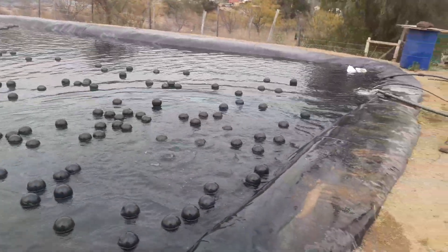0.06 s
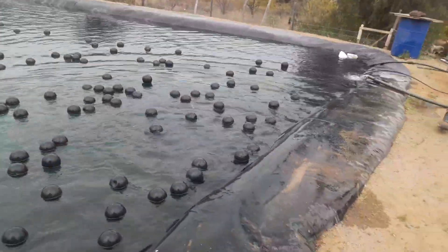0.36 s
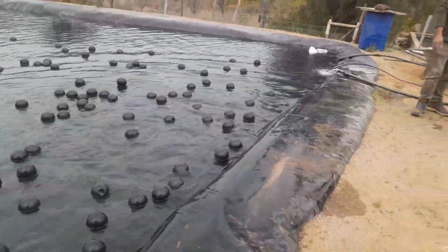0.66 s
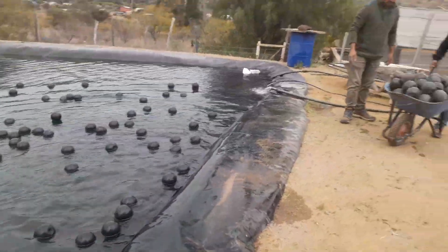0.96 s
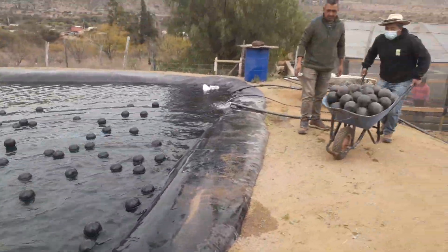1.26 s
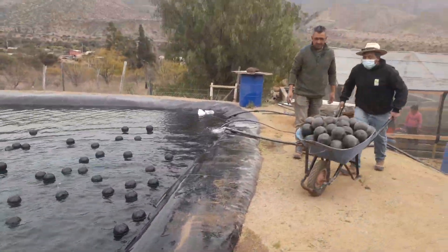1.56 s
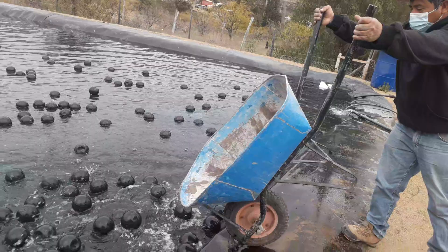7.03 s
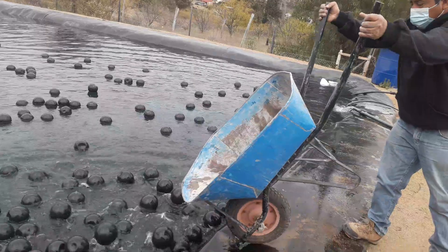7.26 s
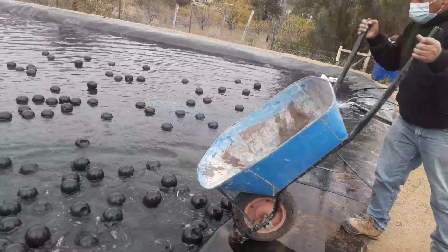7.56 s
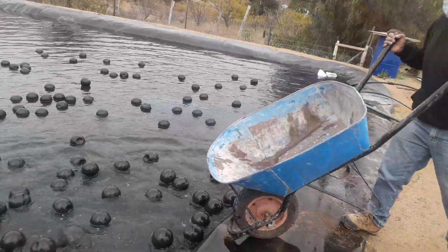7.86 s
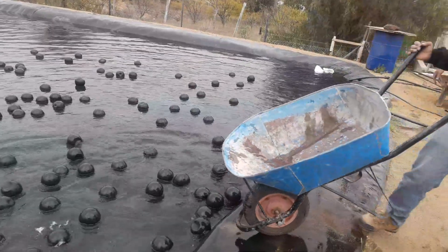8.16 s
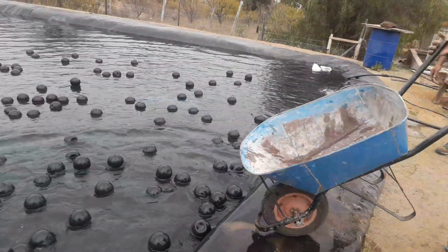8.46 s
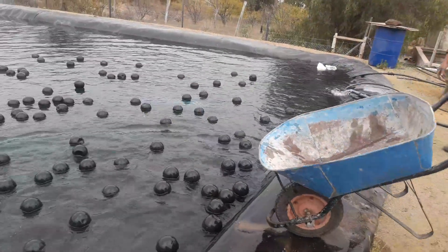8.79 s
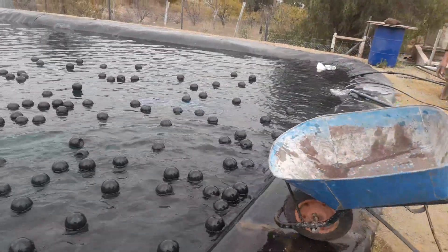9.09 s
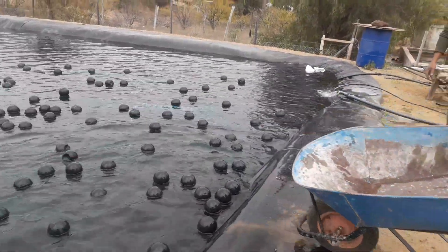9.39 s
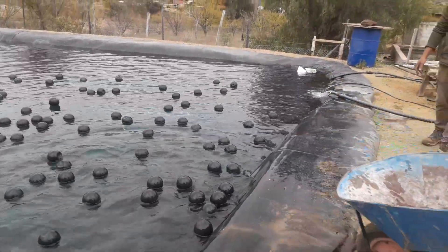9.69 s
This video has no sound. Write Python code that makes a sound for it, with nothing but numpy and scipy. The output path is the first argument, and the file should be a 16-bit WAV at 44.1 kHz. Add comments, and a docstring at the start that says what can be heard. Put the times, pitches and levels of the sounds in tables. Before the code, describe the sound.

Outdoors beside a lined pond, water laps and fizzes while wind buffets the microphone. A loaded steel wheelbarrow rolls over crunching grit and a distant bird whistles once. The barrow tips, and many hollow plastic balls drum on its tray, clack against each other and the liner, and splash into the water. The flow thins to a few clumps, the pond sloshes, and the empty tray rattles and scrapes as it is set back.

```python
"""Outdoors by a lined pond: water laps and fizzes, wind buffets the microphone.
A steel wheelbarrow of hollow plastic balls rolls up over crunching grit; a bird whistles once.
The barrow tips: balls drum on the tray, clack on each other and the liner, and splash into the water.
The flow thins to a few clumps, the pond sloshes, and the empty tray rattles as it is set back."""
import sys
import numpy as np
from scipy import signal
from scipy.fft import rfft, irfft
from scipy.io import wavfile
from scipy.ndimage import uniform_filter1d

SR = 44100
rng = np.random.default_rng(int(sys.argv[2]) if len(sys.argv) > 2 else 0)


def generate_wav(signal):
    """Clip the signal to [-1, 1] and save it as 16-bit WAV at the path in sys.argv[1]."""
    frames = np.transpose(np.atleast_2d(signal))
    scaled = np.clip(frames, -1, 1) * 32767
    pcm = np.round(scaled).astype(np.int16)
    wavfile.write(sys.argv[1], SR, pcm)


N = 437898
TIME = np.arange(N) / SR

# spectra: f/Hz, gain/dB
WIND_EQ = [(20, -25), (45, -14), (80, 3), (130, 5.5), (200, -3), (300, -16), (500, -33.5), (1000, -57)]
LAP_EQ = [(100, -4.5), (250, -3), (400, -18), (700, -2.5), (1000, -8.5), (1400, 0), (2100, -2.5),
          (2850, -8.5), (5000, -4.5), (12000, -33)]
GRIT_EQ = [(1470, -9), (2800, -9), (4000, 0.5), (5200, 3), (6300, -6.5), (7530, 0), (9150, -14.5),
           (10300, -18), (12300, -10), (15500, -15)]
SCRAPE_EQ = [(100, -15.5), (300, -4), (700, 4), (2000, 6.5), (2900, -1), (4200, -1), (7500, -6),
             (10000, -20.5), (12500, -16), (15500, -32)]
TYRE_EQ = [(100, 4.5), (300, -9), (700, 1.5), (1100, -10), (2000, -2), (3000, -18), (8000, -23)]
THUD_EQ = [(40, -43), (80, -14), (130, -7.5), (200, 1.5), (330, -3), (520, -8), (750, -14.5), (1200, -17),
           (2500, -50)]
SHELL_EQ = [(200, -39.5), (450, -12.5), (700, 1.5), (1100, -3.5), (1800, -4), (2400, -8), (2850, -12),
            (3800, -0.5), (6000, -63)]
CRACK_EQ = [(60, -48), (500, -17), (1500, -2.5), (2300, -8), (2850, -18.5), (3450, -4.5), (4300, 3),
            (5900, -6.5), (7400, -4.5), (8600, -12), (10000, -24), (11800, -14), (13500, -24.5),
            (15500, -22.5)]
# gusts on the microphone: t/s, length/s, level/dB
WIND_GUSTS = [(-.03, 0.087, -47.5), (1.187, 0.74, -35), (1.988, 0.63, -31), (2.887, 0.13, -37),
              (3.571, 0.044, -30.5), (5.82, 0.25, -38), (7.062, 0.62, -46), (7.588, 0.064, -37),
              (9.478, 0.19, -44)]
# single buffets: t/s, peak/dB, length/s
WIND_BUFFETS = [(2.045, -15, 0.025), (2.076, -10.5, 0.083), (2.24, -18.5, 0.039), (2.32, -17, 0.045),
                (2.42, -23.5, 0.057)]
# wavelets slapping the bank: t/s, level/dB
BANK_WAVELETS = [(.05, -61), (1.6, -53), (1.8, -62), (7.22, -44.5)]
# sloshes at the bank and around bobbing balls: t/s, length/s, bubble f/Hz, level/dB
POND_SLOSHES = [(0.439, 0.06, 4900, -32.5), (7.713, 0.085, 1190, -39), (7.847, 0.048, 1390, -36),
                (8.096, 0.067, 1760, -43), (8.689, .1, 2400, -34), (8.771, 0.091, 1350, -35.5),
                (9.269, 0.066, 1580, -34)]
# grit under wheel and boots: t/s, length/s, level/dB
GRIT_CRUNCHES = [(2.433, 0.72, -50.5), (8.01, 0.09, -51), (8.266, 0.274, -51.5)]
# drags over ground and liner: t/s, length/s, level/dB, tilt/(dB/octave)
DRAGS = [(0.552, 0.11, -39.5, -2), (1.992, 0.047, -37, -1), (2.424, 0.11, -39, 1.5), (2.597, 0.38, -40, 6),
         (2.896, 0.3, -50, 4), (6.646, 0.085, -34, 6.5), (7.38, 0.02, -24, 5), (7.99, 0.039, -38.5, -2),
         (8.107, 0.058, -36, 0), (9.165, 0.2, -38, 2), (9.563, 0.048, -35.5, 3.5), (9.61, 0.1, -27, 0)]
# stones underfoot, shells meeting: t/s, level/dB
DRY_TICKS = [(1.862, -25), (1.914, -23), (2.26, -21.5), (2.46, -16), (2.625, -23), (2.638, -21),
             (2.66, -24), (2.733, -23), (2.757, -14.5), (2.783, -7.5), (2.931, -21), (3.035, -21),
             (3.063, -15.5), (3.193, -22), (3.356, -17.5), (3.471, -20), (8.085, -17), (8.304, -19.5),
             (8.493, -16.5), (8.544, -17.5), (8.576, -19.5), (8.93, -20), (9.162, -10.5)]
# modes of the loaded tray: f/Hz, level/dB, t60/s
TRAY_MODES = [(199.3, 2.5, 0.16), (240.7, -6.5, 0.38), (272.5, -1.5, 0.24), (312.2, -1.5, 0.14),
              (409.7, -4.5, 0.18), (532.6, -8.5, 0.2), (609, -0.5, 0.091), (659, -7, 0.26),
              (770, -9.5, 0.33), (974, -14, 0.23)]
# jolts of the empty tray: t/s, level/dB
TRAY_JOLTS = [(6.45, -44), (6.8, -57), (7.17, -40), (7.37, -34.5), (9.6, -28)]
# blows on the tray: t/s, peak/dB
TRAY_KNOCKS = [(3.699, -16), (3.823, -14), (4.06, -29), (4.168, -3), (4.392, -4), (4.738, -4.5),
               (4.775, -3), (5.037, -6), (5.167, -8), (7.195, -27), (8.506, -22), (9.147, -18.5),
               (9.493, -22), (9.584, -17.5)]
# single plops: t/s, f/Hz, peak/dB
BALL_PLOPS = [(1.02, 2470, -26), (3.323, 1076, -26), (3.958, 1320, -16), (5.545, 810, -13),
              (5.867, 1030, -15), (6.056, 790, -19), (6.41, 783, -14.5), (6.542, 735, -16),
              (6.724, 655, -20.5), (6.731, 850, -21), (6.804, 280, -25.5), (7.39, 1160, -18),
              (7.725, 990, -33), (8.145, 1600, -31)]
# shells ringing after sharp hits: t/s, f/Hz, peak/dB
SHELL_PINGS = [(6.298, 4000, -14), (6.504, 4160, -11), (7.388, 4900, -16)]
# loud ball hits: t/s, crack level/dB, shell and splash level/dB
BALL_CLACKS = [(4.164, -15, -13), (4.345, -8, -23), (4.532, -3.5, -10.5), (4.612, -0.5, -11.5),
               (4.68, -5, -16), (4.735, 1, -18), (4.777, -8, -16), (4.811, -3.5, -10), (5.015, -16, -24),
               (5.344, -7.5, -30), (5.387, -3.5, -11.5), (5.407, -3.5, -16), (5.475, -7, -18),
               (5.662, -6.5, -11.5), (5.668, -7, -18), (5.826, -11, -16), (5.861, -5, -13.5),
               (5.998, -21, -27), (6.053, -16, -14.5), (6.299, -8, -18.5), (6.372, -5, -23),
               (6.41, -11.5, -17), (6.48, -13, -19), (6.504, -5.5, -37), (6.542, -9.5, -30),
               (6.654, -16, -31), (6.667, -13, -44), (6.722, -13, -21), (6.8, -15.5, -23.5),
               (7.05, -15, -46), (7.312, -23, -22.5), (7.387, -10, -21), (7.473, -18, -26)]
# clumps and gaps among the last balls: t/s, clatter and spray gain/dB
BALL_CLUMPS = [(5.38, 0), (5.85, 0.5), (6.26, -4.5), (6.39, 5), (6.49, -7), (6.74, 1.5), (7.04, 3.5),
               (7.28, 2)]

ROLL_S, CREEP_S, SPILL_S, SLIDE_S, EMPTY_S, LANDED_S = 2.31, 3.53, 3.675, 3.995, 6.46, 7.42
FULL_FLOW_S, ONSET_S, RUN_OUT_S = 0.27, 0.084, 0.11
EMPTY_PITCH_RATIO = 1.063  # tray modes rise with the load off


def amp(db):
    """Decibels to gain."""
    return 10 ** (np.asarray(db) / 20)


def unit(x):
    """Scale to rms 1."""
    return x / np.sqrt(np.mean(x ** 2) + 1e-20)


def peak(x):
    """Scale to peak 1."""
    return x / np.max(np.abs(x))


def unit_hit(x):
    """Scale to the energy of a typical hit of peak 1."""
    return x / np.sqrt(np.sum(x ** 2) / SR) * 0.025


def span(length_s):
    """Time axis of a short sound."""
    return np.arange(int(length_s * SR)) / SR


def noise(t):
    """White noise as long as t."""
    return rng.standard_normal(len(t))


def decay(t, t60_s):
    """Exponential fall, 60 dB in t60_s."""
    return np.exp(-np.log(1000) * t / t60_s)


def arch(t, length_s):
    """Half-sine envelope."""
    return np.sin(np.pi * np.minimum(t / length_s, 1))


def gate(start_s, end_s, attack_s=ONSET_S, release_s=RUN_OUT_S):
    """Linear rise from start_s, linear fall from end_s."""
    return np.clip((TIME - start_s) / attack_s, 0, 1) * np.clip(1 - (TIME - end_s) / release_s, 0, 1)


def swell(s, width_s):
    """Gaussian bump at time s."""
    return np.exp(-((TIME - s) / width_s) ** 2)


def sway(depth_db, rate_hz):
    """Randomly wandering gain."""
    size = int(SR / rate_hz)
    return amp(depth_db * unit(uniform_filter1d(uniform_filter1d(noise(TIME), size), size // 2)))


def add(out, s, sound):
    """Mix a sound in at time s."""
    i = int(s * SR)
    out[i:i + len(sound)] += sound[:max(N - i, 0)]


def colour(x, eq, size=4096):
    """Minimum-phase filter through (f/Hz, gain/dB) points."""
    hz, db = np.transpose(eq)
    bins_hz = np.arange(size // 2 + 1) * SR / size
    log_gain = np.log(amp(np.interp(np.log(bins_hz + 1), np.log(hz), db)))
    cepstrum = irfft(log_gain)
    cepstrum[1:size // 2] *= 2
    cepstrum[size // 2 + 1:] = 0
    return signal.fftconvolve(x, irfft(np.exp(rfft(cepstrum))))[:len(x)]


def shower(shapes, rate_hz, spread_db):
    """Random impacts of uneven size drawn from shapes, levelled to rms near 1."""
    out, shapes = np.zeros(N), [unit(shape) for shape in shapes]
    chance, pick = rng.random(N), rng.integers(len(shapes), size=N)
    size = np.minimum(rng.standard_exponential(N), 3.2)
    for i in np.flatnonzero(chance < rate_hz / SR):
        add(out, i / SR, amp(spread_db * size[i]) * shapes[pick[i]])
    power = uniform_filter1d(uniform_filter1d(out ** 2, SR // 9), SR // 14)
    return out / np.sqrt(np.abs(power) + 1e-3 * np.mean(out ** 2))


def wind(breeze_db=-61.5):
    """Eddies rumble on the microphone; hard buffets reach higher in pitch."""
    eddies = sway(depth_db=4.5, rate_hz=36)
    gusts = sum(amp(db) * gate(s, s + length_s, attack_s=0.32 * length_s, release_s=0.11)
                for s, length_s, db in WIND_GUSTS)
    out = (amp(breeze_db) + gusts) * unit(colour(noise(TIME), WIND_EQ) * eddies)
    buffet_eq = [(1.47 * hz, db) for hz, db in WIND_EQ]
    t = span(0.15)
    for s, db, length_s in WIND_BUFFETS:
        add(out, s, amp(db) * peak(colour(noise(t) * arch(t, length_s), buffet_eq)))
    return out


def bird(start_s=3.21, length_s=0.15, first_hz=4830, last_hz=3680, peak_db=-40):
    """One thin, distant, falling whistle."""
    along = np.clip((TIME - start_s) / length_s, 0, 1)
    hz = first_hz + (last_hz - first_hz) * along
    return amp(peak_db) * np.sin(np.pi * along) ** 2 * np.sin(2 * np.pi * np.cumsum(hz) / SR)


def bubble(hz, cycles):
    """An air pocket rings and glides up as it surfaces."""
    t = span(0.08)
    t60_s = cycles / hz
    glide = 1 + 0.17 * np.minimum(t / t60_s, 1)
    return np.sin(2 * np.pi * hz * t * glide) * decay(t, t60_s)


def bubbles(rate_hz, low_hz, high_hz, cycles, count=2000):
    """Bubbles of random time, pitch and size; rms 1."""
    out = np.zeros(N)
    gaps, pitches, sizes = rng.random((count, 3)).T
    for s, pitch, size in zip(np.cumsum(-np.log(gaps) / rate_hz), pitches, sizes):
        add(out, s, amp(17.4 * size) * bubble(low_hz * (high_hz / low_hz) ** pitch, cycles))
    return unit(out)


def lapping(calm_db=-52, stirred_db=-49.5):
    """The pond laps and gurgles in clusters, a little louder once the balls are in."""
    base = amp(np.interp(TIME, [SPILL_S, SLIDE_S], [calm_db, stirred_db]))
    wavelets = sum(amp(db) * swell(s, width_s=0.1) for s, db in BANK_WAVELETS)
    lull = amp(-7 * swell(0.47, width_s=0.079))
    t = span(0.02)
    laps = shower([noise(t) * decay(t, 0.043) for _ in range(20)], rate_hz=700, spread_db=3.9)
    gurgles = bubbles(rate_hz=36, low_hz=1100, high_hz=2500, cycles=30)
    water = amp(3.5) * unit(colour(laps, LAP_EQ)) + amp(-4.5) * gurgles
    return (base + wavelets) * lull * sway(depth_db=2, rate_hz=12) * water


def crackle(floor_db=-49.5):
    """Tiny bubbles and grit fizz throughout, swelling as wheel and boots crunch."""
    crunches = sum(amp(db) * gate(s, s + length_s, attack_s=0.012, release_s=0.035)
                   for s, length_s, db in GRIT_CRUNCHES)
    t = span(0.02)
    bursts = [bubble(hz, cycles=6) for hz in np.geomspace(3000, 13000, 14)]
    grains = [noise(t) * decay(t, 0.002) for _ in range(9)]
    specks = unit(colour(shower(bursts + grains, rate_hz=900, spread_db=6.1), GRIT_EQ))
    hiss = unit(colour(noise(TIME), GRIT_EQ))
    flicker = sway(depth_db=2.3, rate_hz=26)
    froth = bubbles(rate_hz=120, low_hz=3990, high_hz=8150, cycles=114)
    fizz = flicker * (amp(1.5) * specks + amp(-3.5) * froth)
    return (amp(floor_db) + crunches) * (fizz + amp(-7) * hiss)


def sloshes(count=12, range_octaves=1.15):
    """Short washes of water, each trapping bubbles of like size."""
    out = np.zeros(N)
    t = span(0.3)
    for s, length_s, hz, db in POND_SLOSHES:
        add(out, s, amp(db - 18.5) * unit(colour(noise(t), LAP_EQ)) * arch(t, length_s))
        for when, pitch, softness in rng.random((count, 3)):
            bubble_hz = hz * 2 ** (range_octaves * (pitch - 0.5))
            add(out, s + when * length_s, amp(db - 9.6 * softness) * bubble(bubble_hz, cycles=43))
    return out


def scrapes():
    """Dragging: dense runs of tiny slips, brighter on sharp grit."""
    out = np.zeros(N)
    t = span(0.4)
    for s, length_s, db, tilt_db in DRAGS:
        slips = noise(t) * amp(4.6 * unit(uniform_filter1d(noise(t), SR // 400)))
        eq = [(hz, gain_db + tilt_db * np.log2(hz / 2000)) for hz, gain_db in SCRAPE_EQ]
        add(out, s, amp(db) * unit(colour(slips, eq)) * np.sqrt(np.abs(arch(t, length_s))))
    return out


def ticks():
    """Dry clicks of stones underfoot and shells meeting."""
    out = np.zeros(N)
    t = span(0.05)
    for s, db in DRY_TICKS:
        click = noise(t) * (decay(t, 0.012) + amp(-16) * decay(t, 0.056))
        add(out, s, amp(db - 3.5) * unit_hit(colour(click, GRIT_EQ)))
    return out


def wheel(level_db=-48):
    """The tyre crushes packed earth in dull grains until the barrow stops to tip."""
    t = span(0.01)
    grains = shower([noise(t) * decay(t, 0.012) for _ in range(20)], rate_hz=600, spread_db=4.3)
    return amp(level_db) * gate(ROLL_S, SPILL_S) * unit(colour(grains, TYRE_EQ))


def tray_blow(thud_db, thud_t60_s, damping, pitch_ratio=1):
    """A dull thud plus steel modes that vary with load and place struck."""
    t = span(0.5)
    ring = np.zeros(len(t))
    for hz, db, t60_s in TRAY_MODES:
        gain = amp(db) * rng.normal(1, 0.45)
        mode_hz = pitch_ratio * hz * rng.normal(1, 0.0097)
        phase = np.pi * rng.integers(2)
        ring += gain * np.sin(2 * np.pi * mode_hz * t + phase) * decay(t, t60_s / damping)
    thud = peak(colour(noise(t) * decay(t, thud_t60_s), THUD_EQ))
    low_cut = signal.butter(2, 115, "high", fs=SR, output="sos")  # the blows are cut below about 115 Hz
    return signal.sosfilt(low_cut, peak(ring) + amp(thud_db) * thud)


def tray_rattle(t60_s=0.79, shiver_db=-49.5):
    """The empty tray shivers when handled and shakes after each jolt."""
    shakes = sum(amp(db) * (TIME > s) * decay(np.abs(TIME - s), t60_s) for s, db in TRAY_JOLTS)
    shiver = amp(shiver_db) * gate(EMPTY_S, TIME[-1])
    blows = [tray_blow(thud_db=0, thud_t60_s=0.2, damping=0.62, pitch_ratio=EMPTY_PITCH_RATIO)
             for _ in range(12)]
    return (shakes + shiver) * shower(blows, rate_hz=60, spread_db=3.1)


def tray_hum(start_s=5.24, level_db=-36, t60_s=0.64):
    """The last rolling balls excite the lightened tray's lowest mode."""
    t = span(0.5)
    mode = np.sin(2 * np.pi * TRAY_MODES[0][0] * t) * decay(t, t60_s)
    hum = shower([mode], rate_hz=90, spread_db=2.2)
    return amp(level_db) * gate(start_s, EMPTY_S, attack_s=FULL_FLOW_S) * hum


def tray_knocks():
    """Single blows on the tray, ringing higher once it is empty."""
    out = np.zeros(N)
    for s, db in TRAY_KNOCKS:
        ratio = EMPTY_PITCH_RATIO if s > EMPTY_S else 1
        blow = tray_blow(thud_db=5.7, thud_t60_s=0.13, damping=1, pitch_ratio=ratio)
        add(out, s, amp(db) * peak(blow))
    return out


def plops():
    """The hollow behind a ball closes, or a ball bobs."""
    out = np.zeros(N)
    for s, hz, db in BALL_PLOPS:
        add(out, s, amp(db) * bubble(hz, cycles=34.6))
    return out


def pings(t60_s=0.029):
    """A sharp hit leaves a shell ringing on one high mode."""
    out = np.zeros(N)
    t = span(0.05)
    for s, hz, db in SHELL_PINGS:
        add(out, s, amp(db) * np.sin(2 * np.pi * hz * t) * decay(t, t60_s))
    return out


def shell(t60_s, count=14):
    """Hollow tock of a thin plastic ball: a cluster of quickly damped modes."""
    t = span(0.15)
    hz = 450 * 2 ** (3 * rng.random((count, 1)))
    gains = rng.standard_normal((count, 1))
    modes = gains * np.sin(2 * np.pi * hz * t) * decay(t, t60_s * np.sqrt(1000 / hz))
    scuff = 0.45 * noise(t) * decay(t, t60_s)
    return peak(colour(peak(modes.sum(0)) + scuff, SHELL_EQ))


def crack(rise_s, t60_s, tail_db, tail_t60_s, vary_db):
    """A shell slaps water: quick rise, scattered tail, random colour."""
    t = span(0.15)
    attack = np.minimum(t / rise_s, 1) ** 2
    after_s = np.maximum(t - rise_s, 0)
    fall = decay(after_s, t60_s) + amp(tail_db) * decay(after_s, tail_t60_s)
    eq = [(hz, db + vary_db * rng.standard_normal()) for hz, db in CRACK_EQ]
    return peak(colour(noise(t) * attack * fall, eq))


def splash(swell_s=0.011, bright_db=0.46):
    """Water thrown up by a ball swells and falls back as spatter."""
    t = span(0.15)
    spatter = noise(t) * amp(3 * unit(uniform_filter1d(noise(t), SR // 300)))
    spatter *= t * np.exp(-t / swell_s)
    return peak(unit(colour(spatter, SHELL_EQ)) + amp(bright_db) * unit(colour(spatter, CRACK_EQ)))


def clacks():
    """Single loud landings: crack, hollow tock and splash."""
    out = np.zeros(N)
    for s, crack_db, shell_db in BALL_CLACKS:
        snap = crack(rise_s=0.0015, t60_s=0.014, tail_db=-17, tail_t60_s=0.06, vary_db=2)
        add(out, s - 0.0005, amp(crack_db - 0.5) * unit_hit(snap))
        add(out, s, amp(shell_db + 6) * unit_hit(shell(t60_s=0.13, count=24)))
        add(out, s, amp(shell_db + 4) * unit_hit(splash()))
    return out


def stream(full_db, first_rel_db, swell_s, drain_db_per_s, end_s):
    """Gain of one stage of the fall: creep, first spill, swell as the load slides, steady drain."""
    sliding = np.clip((TIME - SLIDE_S) / swell_s, 0, 1)
    draining_s = np.maximum(TIME - SLIDE_S - swell_s - FULL_FLOW_S, 0)
    db = full_db + first_rel_db * (1 - sliding) ** 1.6 - drain_db_per_s * draining_s
    creep = amp(-11) * gate(CREEP_S, SPILL_S, attack_s=SPILL_S - CREEP_S)
    return amp(db) * np.maximum(creep, gate(SPILL_S, end_s))


def flow(gain, trickle=0.15):
    """Relative impact rate: a crowd of balls when loud, separate hits when quiet."""
    return trickle + (gain / gain.max()) ** 0.7


def pour():
    """Balls drum over the tray, clatter down the liner and throw up spray."""
    drum = stream(full_db=-16.5, first_rel_db=-11, swell_s=0.37, drain_db_per_s=11.5, end_s=EMPTY_S)
    drum += amp(-51) * gate(ROLL_S, SLIDE_S)  # the tray shivers while rolling
    clatter = stream(full_db=-21, first_rel_db=-15.5, swell_s=0.6547, drain_db_per_s=10, end_s=LANDED_S)
    spray = stream(full_db=-23, first_rel_db=-15, swell_s=0.81, drain_db_per_s=8.5, end_s=LANDED_S)
    clumps = amp(sum(db * swell(s, width_s=0.051) for s, db in BALL_CLUMPS))
    clatter, spray = clumps * clatter, clumps * spray
    blows = [tray_blow(thud_db=-0.5, thud_t60_s=0.12, damping=0.63) for _ in range(30)]
    tray = shower(blows, rate_hz=240 * flow(drum), spread_db=3)
    shells = shower([shell(t60_s=0.071) for _ in range(90)], rate_hz=280 * flow(clatter), spread_db=3.3)
    slaps = [crack(rise_s=0.002, t60_s=0.01, tail_db=-1.8, tail_t60_s=0.076, vary_db=5)
             for _ in range(60)]
    drops = shower(slaps, rate_hz=900 * flow(spray), spread_db=5.3) * sway(depth_db=1.2, rate_hz=9.5)
    gurgles = bubbles(rate_hz=120, low_hz=624, high_hz=1957, cycles=43)
    balls = amp(0.5) * shells + amp(-8) * gurgles
    return amp(1.26) * drum * tray + clatter * balls + amp(0.85) * spray * drops


def scene():
    """Open air, mono."""
    barrow = wheel() + pour() + tray_hum() + tray_rattle()
    contacts = clacks() + tray_knocks() + ticks() + pings() + plops() + scrapes()
    background = sloshes() + lapping() + crackle() + wind() + bird()
    return (barrow + contacts + background)[None]


def record(dry, low_hz=46, top_hz=15900):
    """Bass cut, soft clip, steep treble cut."""
    thin = signal.sosfilt(signal.butter(3, low_hz, "high", fs=SR, output="sos"), dry)
    rounded = 0.92 * thin / (1 + (thin / 0.88) ** 4) ** (1 / 4)
    return signal.sosfilt(signal.ellip(10, 0.2, 70, top_hz, fs=SR, output="sos"), rounded)


dry = scene()
out = record(dry)
generate_wav(out)
```